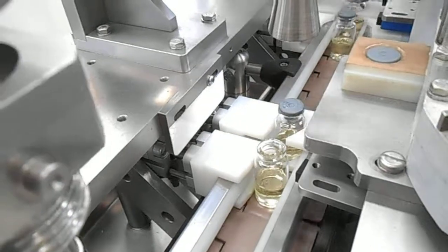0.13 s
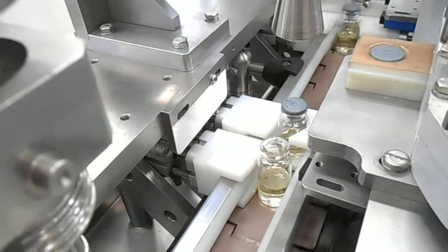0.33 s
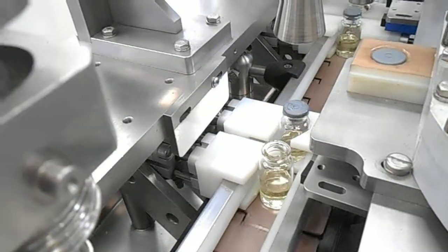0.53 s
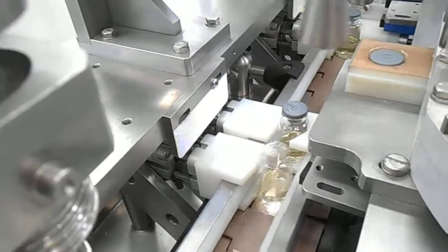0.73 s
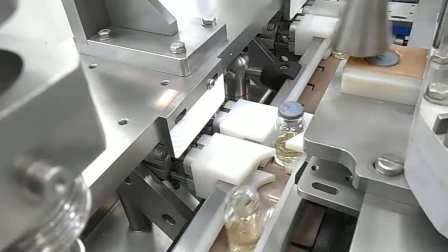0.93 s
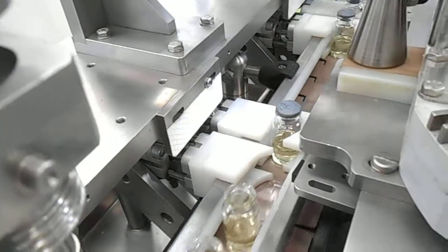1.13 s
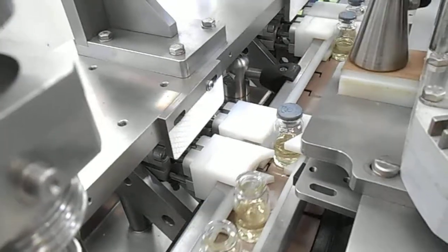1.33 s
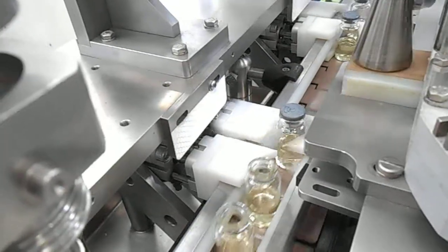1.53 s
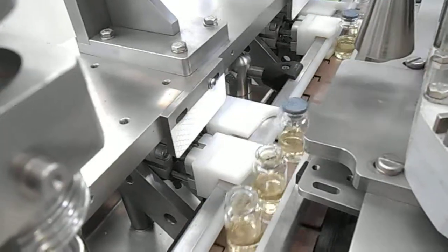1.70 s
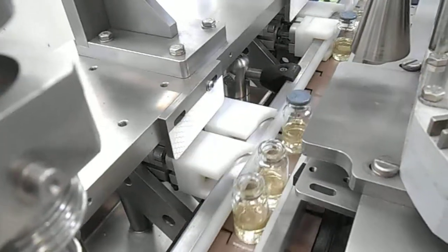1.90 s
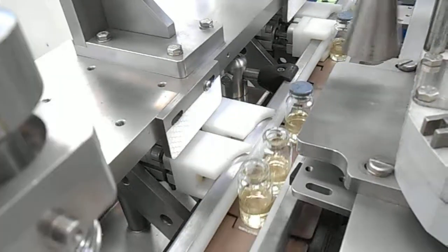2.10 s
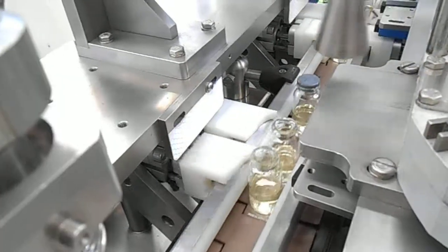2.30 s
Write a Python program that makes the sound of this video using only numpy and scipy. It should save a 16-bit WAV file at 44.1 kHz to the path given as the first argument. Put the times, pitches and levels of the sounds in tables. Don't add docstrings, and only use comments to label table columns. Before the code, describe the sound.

A vial filling machine runs close by, with low motor hum and airy hiss. Air puffs at 0.1 and 0.55 s; clacks and hollow thuds cluster near 0.3 and 0.8. From 1.03 to 1.35 a loud, slightly clipped flurry of clacks, rail rings, scrapes and glass clinks. The hum drops; a lower clink at 1.44, sharp snap at 1.6, lighter snaps at 1.9 and 2.05, then high chirps as hum and hiss rise.

```python
import sys
import numpy as np
from scipy import signal
from scipy.io import wavfile
from scipy.ndimage import uniform_filter1d

SR = 44100
rng = np.random.default_rng(int(sys.argv[2]) if len(sys.argv) > 2 else 0)


def generate_wav(sig):
    pcm = np.round(np.clip(np.atleast_2d(sig).T, -1, 1) * 32767).astype(np.int16)
    wavfile.write(sys.argv[1], SR, pcm)


def natural_amplitude(level_db):
    exponent = np.asarray(level_db, float) / 20
    return 10 ** exponent


N = 103635
T = np.arange(N) / SR

# pitch_hz, density_db
HALL_AIR = [(25, -10.5), (208, -9), (336, -10), (754, -15), (3100, -21.5), (6400, -17), (9000, -40.5),
            (12500, -63)]
# pitch_hz, width_hz, level_db
HUM_MODES = [(76.53, 31.43, -8.5), (203.61, 37.44, -1), (286.36, 38.65, -8.5), (482.87, 44.21, -2),
             (755.8, 60.53, -4), (1694.7, 71.5, -14.5)]
# time_s, level_db
PHONE_DUCK = [(0, -40.5), (.1, -31.5), (.35, -31), (.45, -34.5), (.6, -30), (1.03, -30), (1.17, -41.5),
              (1.4, -41.5), (1.5, -41), (1.72, -48.5), (1.88, -39), (2.08, -37.5), (2.35, -33)]
# time_s, level_db
FEEDER_HISS = [(0, -47.5), (1.7, -59), (1.9, -48), (2.35, -37)]
# start_s, level_db
FEEDER_CHIRPS = [
    (1.0058, -13.5),
    (1.7783, -43.5),
    (1.8397, -35.5),
    (2.0382, -28),
    (2.2114, -23.5),
    (2.271, -36),
    (2.32, -20),
]
# pitch_hz, level_db, wander_hz
MOTOR_TONES = [(203.86, -38.5, 5.7396), (769.7, -43, 7.783)]
# pitch_hz, width_hz, level_db
FAR_SOURCES = [(49.86, 78.9, -45), (8512, 249.7, -74), (1500, 1077, -60)]
# pitch_hz, width_hz, level_db
NOZZLE_MODES = [(2924.5, 441, -4), (4429, 245.3, 4), (7674.5, 676.7, -3), (8239.6, 202.2, -0.5),
                (10745, 1687, -19), (5578, 5738, -0.5)]
# start_s, length_s, level_db, release_s, attack_s
AIR_PUFFS = [
    (0.117, 0.22646, -30.5, 0.01423, 0.04942),
    (0.553, 0.0979, -22, 0.002848, 0.01935),
    (0.633, 0.2083, -34.5, 0.54, 0.0499),
    (0.85, 0.0245, -44, 0.0075, 0.01034),
]
# start_s, level_db, ring_hz, t60_s
SLIDE_CLACKS = [(0.1431, -18.5, 4455, 0.0268), (0.167, -12.5, 4420, 0.01402), (0.2651, -7, 1775, 0.1043),
                (0.2975, -7.5, 4155, 0.0229), (0.3044, -6.5, 1191, 0.07606), (0.546, -16.5, 7425, 0.0183),
                (0.5544, -37, 4490, 0.0182), (0.7627, -12, 2357, 0.07305), (0.7697, -6, 3079, 0.16536),
                (0.7929, -7.5, 3857, 0.1023), (1.0352, -0.5, 3704, 0.05256), (1.044, -16, 4313, 0.0354),
                (1.0754, -0.5, 3617, 0.0778), (1.1244, -11.5, 3900, 0.029), (1.1845, -16, 3838, 0.1026),
                (1.2195, -14, 4039, 0.01194), (1.3377, -15.5, 5922, 0.03184),
                (1.3676, -17.5, 4198, 0.02706), (1.4712, -22, 4597, 0.0249), (1.6075, -2, 1997, 0.0188),
                (1.896, -15.5, 4647, 0.0464), (2.053, -16.5, 5008, 0.03265)]
# start_s, level_db, ring_hz, t60_s
HIGH_TICKS = [(0.5066, -41.5, 4850, 0.03504), (1.0604, -14, 4913, 0.00772), (1.0844, -3, 5096, 0.01405),
              (1.1044, -3.5, 4764, 0.0362), (1.138, -1.5, 5108, 0.01637), (1.1614, -27.5, 5410, 0.02033),
              (1.2263, -10, 5164, 0.01404), (1.255, -19, 5921, 0.03093), (1.28, -36.5, 4341, 0.0209),
              (1.3067, -13, 5539, 0.0171), (1.3175, -25, 6300, 0.02633), (1.382, -17, 5942, 0.03435),
              (1.4027, -19.5, 4690, 0.0247), (1.4377, -5.5, 4483, 0.00997), (1.4422, 2, 4183, 0.01029),
              (1.6524, -23, 5663, 0.009736), (1.679, -30, 5654, 0.02092), (1.738, -46, 5370, 0.01746),
              (1.7552, -25, 6095, 0.00849), (1.7853, -28, 6157, 0.02994), (1.947, -32.5, 6632, 0.0128),
              (1.3118, -8.5, 6273, 0.02), (1.2985, -27, 5864, 0.02104), (1.4125, -22.5, 3972, 0.03173)]
# pitch_hz, level_db, t60_s
FRAME_MODES = [(303.2, -12.5, 0.03355), (322.59, -10, 0.0813), (412.02, 1, 0.132), (466.83, 1.5, 0.21),
               (526.94, 6.5, 0.12166), (598.82, 10, 0.03297), (741.65, -1.5, 0.2001),
               (830.68, 9.5, 0.024846), (1006.1, 1, 0.0436), (1307.9, 1.5, 0.011)]
# start_s, level_db, chatter_s, tilt_db_per_octave
PUSHER_THUDS = [(0.166, -20, 0.006936, 18.5), (0.262, -13.5, 0.01392, -4), (0.294, -8.5, 0.007486, -19.5),
                (0.305, -3.5, 0.005947, 3), (0.777, -16, 0.01695, 6.5), (0.794, -8, 0.021437, -4),
                (0.824, -16, 0.00452, -11.5), (1.084, -7.5, 0.00764, -10), (1.103, -23, 0.0032, -20),
                (1.4195, -14.5, 0.013793, 6), (1.436, -17, 0.007572, 12.5), (1.59, -22, 0.012215, -0.5),
                (1.894, -15, 0.01117, 13), (2.05, -21, 0.01025, -8.5)]
# start_s, length_s, level_db
BELT_SHUDDERS = [
    (0.297, 0.159, -33.5),
    (1.048, 0.085, -29),
    (2.046, 0.0581, -31),
]
# start_s, length_s,
# level_db, centre_hz
VIAL_SCRAPES = [(0.744, 0.09096, -27, 4082), (1.031, 0.08134, -19, 3800), (1.127, 0.09204, -36, 3557),
                (1.296, 0.02023, -26, 4722), (1.359, 0.02613, -32, 4722), (1.572, 0.02643, -39.5, 3500),
                (1.647, 0.03415, -39, 4416), (2.063, 0.0482, -36.5, 3594), (1.203, 0.21925, -38.5, 1500),
                (1.382, 0.0188, -66.5, 5926), (1.787, 0.01457, -45, 4263), (1.849, 0.57, -51.5, 9695)]
# pitch_hz, level_db, t60_s
LATCH = [(1170.7, -7, 0.01623), (1500, -3.5, 0.0178), (1926, -3, 0.0245), (2453.5, -3, 0.00836),
         (3052.9, -11, 0.0106), (3980.1, -1.5, 0.01381), (4521.2, -7, 0.01108), (5266.4, -1.5, 0.00598),
         (6655.5, -11.5, 0.01617), (8340.8, -8.5, 0.0147), (9768.4, -10, 0.01782)]
STOP = [(2299.6, -4.5, 0.02928), (3533.6, -15, 0.0189), (4861.6, -2, 0.02105), (5227, -5, 0.01792),
        (6890.5, -7, 0.0119), (9946.6, -12.5, 0.0202)]
PADDLE = [(2409.3, -0.5, 0.03057), (3500, -2.5, 0.0218), (3900, -1, 0.02137), (5285.2, 1.5, 0.0335),
          (6300, -8, 0.0195)]
SQUEAL = [(1641.8, -0.5, 0.0597), (1756.5, -6, 0.0146), (1577.7, -15.5, 0.0387)]
FINGER = [(3224.9, -0.5, 0.01771), (4650.3, 0.5, 0.02057), (4770.6, 0.5, 0.0315), (7180, -0.5, 0.01287),
          (8127.4, 3, 0.00688), (9588, -3.5, 0.01006), (10403, 1, 0.01214), (11668, -7, 0.016)]
# start_s, level_db, free_ring_s, part
LATCH_SNAPS = [(1.6073, -0.5, 0.0019155, LATCH), (1.6165, -25, 0.000841, STOP),
               (1.6258, -41, 0.001885, STOP), (1.8958, -12.5, 0.001491, STOP),
               (2.0528, -6, 0.001309, FINGER), (0.761, -12.5, 0.00186, PADDLE),
               (0.77, -4, 0.002144, PADDLE), (0.7765, -11.5, 0.00239, PADDLE),
               (0.805, -20, 0.00372, PADDLE), (1.557, -47.5, 0.000912, FINGER),
               (1.107, -11.5, 0.01918, SQUEAL)]
# pitch_hz, level_db, t60_s
RAIL_MODES = [(1664, 0, 0.055), (1632, -2, 0.06), (1780, -4, 0.02), (1500, -9, .03)]
# start_s, level_db
KNOCKS = [(1.058, -14), (1.081, -13), (1.105, -8), (1.114, -14), (1.14, -17), (1.162, -21), (1.2, -29),
          (1.222, -26), (1.31, -30), (1.957, -36), (2.072, -35), (2.112, -35)]
# ratio_to_lowest, level_db, t60_s
VIAL_MODES = [(1, 0, .012), (1.012, -30, .1), (1.27, -12, .01), (1.75, -14, .01), (2.4, -20, .022)]
# start_s, level_db, pitch_hz, free_ring_s
VIAL_CLINKS = [
    (1.076, 1, 3950, .005),
    (1.1385, 0, 4000, .002),
    (1.227, -5, 3940, .002),
    (1.256, -19, 3930, .002),
    (1.281, -17, 4100, .001),
    (1.324, -11, 3920, .003),
]
# ratio_to_lowest, level_db, t60_s
CAPPED_MODES = [(1, 0, .011), (1.014, -33, .22), (1.4, -11, .01), (1.95, -15, .01), (2.9, -22, .008)]
# start_s, level_db, pitch_hz, free_ring_s
STOPPERED_CLINK = (1.4435, 0, 3300, .0062)

FLICKER_DB, FLICKER_PER_S = 1, 15
RISE_S = 0.0007


def band(x, hz, width_hz):
    return signal.lfilter(*signal.iirpeak(hz, max(hz / width_hz, 1 / 3), fs=SR), x)


def band_noise(hz, width_hz):
    return band(band(rng.standard_normal(N), hz, width_hz), hz, 2 * width_hz)


def unit(x):
    return x / np.sqrt(np.mean(x ** 2))


def walk(rate_per_s):
    hold = int(SR / rate_per_s)
    steps = np.repeat(rng.standard_normal(N // hold + 1), hold)
    smooth = uniform_filter1d(uniform_filter1d(steps, hold), hold)
    return unit(smooth[:N])


def flicker():
    return natural_amplitude(FLICKER_DB * walk(FLICKER_PER_S))


def gate(start_s, length_s, attack_s, release_s):
    attack = np.clip((T - start_s) / attack_s, 0, 1)
    return attack * np.exp(-np.maximum(T - start_s - length_s, 0) / release_s)


def decay(t, t60_s):
    return 1000.0 ** (-t / t60_s)


def add(out, start_s, x, peak_db):
    i = int(start_s * SR)
    out[i:i + len(x)] += (x * natural_amplitude(peak_db) / np.abs(x).max())[:N - i]


def strike(modes, chatter_s, scatter_db):
    t = T[:SR // 4]
    ring = np.zeros(len(t))
    for hz, db, t60_s in modes:
        level = natural_amplitude(db + scatter_db * rng.standard_normal())
        ring += level * np.sin(2 * np.pi * hz * t) * decay(t, t60_s)
    push = rng.standard_normal(SR // 20) * np.exp(-(T[:SR // 20] / chatter_s) ** 2)
    return signal.fftconvolve(ring, push)


def clink(hz, free_ring_s, modes):
    t = T[:SR // 4]
    ring = np.zeros(len(t))
    for ratio, db, t60_s in modes:
        tone = np.sin(2 * np.pi * (hz * ratio * t + rng.random()))
        ring += natural_amplitude(db) * tone * decay(np.maximum(t - free_ring_s, 0), t60_s)
    return np.minimum(t / RISE_S, 1) * ring


def duck_db():
    return np.interp(T, *np.array(PHONE_DUCK).T) + 33.5


def machinery():
    hall_hz, hall_db = np.array(HALL_AIR).T
    hall = np.zeros(N)
    for hz in 28 * 2 ** np.arange(0, 9, 0.5):
        level = natural_amplitude(np.interp(np.log(hz), np.log(hall_hz), hall_db))
        hall += level * band_noise(hz, hz / 2.0751) * flicker()
    hum = sum(natural_amplitude(db) * unit(band_noise(hz, width_hz) * flicker()) for hz, width_hz, db in HUM_MODES)
    duck = duck_db()
    return unit(hall) * natural_amplitude(-34 + duck) + unit(hum) * natural_amplitude(-36.5 + duck)


def feeder():
    hiss = unit(band_noise(6429, 491.6) * flicker())
    level = natural_amplitude(np.interp(T, *np.array(FEEDER_HISS).T))
    for start_s, db in FEEDER_CHIRPS:
        level = level + natural_amplitude(db - 10) * gate(start_s, 0.004766, 0.001323, 0.010264)
    return hiss * level


def far():
    return sum(natural_amplitude(db) * flicker() * unit(band_noise(hz, width_hz)) for hz, width_hz, db in FAR_SOURCES)


def motors():
    duck = duck_db()
    out = np.zeros(N)
    for hz, db, wander_hz in MOTOR_TONES:
        level = natural_amplitude(db + duck + 0.97 * walk(29.641))
        cycles = np.cumsum(hz + wander_hz * walk(39.759)) / SR
        out += level * np.sin(2 * np.pi * cycles)
    return out


def exhaust():
    flutter_db = 0
    jet = sum(natural_amplitude(db + flutter_db * walk(151.1)) * unit(band_noise(hz, width_hz))
              for hz, width_hz, db in NOZZLE_MODES)
    puffs = sum(natural_amplitude(db) * gate(start_s, length_s, attack_s, release_s)
                for start_s, length_s, db, release_s, attack_s in AIR_PUFFS)
    return unit(jet) * puffs


def clack(ring_hz, t60_s):
    crack_hz, crack_width_hz, tail_db, tail_s, ring_db = 3800, 4380, -22, 0.06702, 7
    t = T[:SR // 6]
    envelope = decay(t, t60_s) + natural_amplitude(tail_db) * decay(t, tail_s)
    burst = rng.standard_normal(len(t)) * envelope * np.minimum(t / RISE_S, 1)
    crack = band(burst, np.sqrt(ring_hz * crack_hz), crack_width_hz)
    crack = band(crack, crack_hz, 2 * crack_width_hz)
    ring_width_hz = max(ring_hz / 10, 650)
    ring = sum(gain * band(burst, ratio * ring_hz, ring_width_hz)
               for ratio, gain in ((1.0106, 0.9871), (0.55066, 0.487), (1.7979, 0.2706)))
    return unit(crack) + natural_amplitude(ring_db) * unit(ring)


def clacks():
    lowpass = signal.butter(2, 8500, fs=SR)
    out = np.zeros(N)
    for start_s, db, ring_hz, t60_s in list(SLIDE_CLACKS) + list(HIGH_TICKS):
        add(out, start_s, signal.lfilter(*lowpass, clack(ring_hz, t60_s)), db)
    return out


def thuds():
    highpass = signal.butter(2, 293.2, "high", fs=SR, output="sos")
    out = np.zeros(N)
    for start_s, db, chatter_s, tilt_db in PUSHER_THUDS:
        modes = []
        for hz, mode_db, t60_s in FRAME_MODES:
            shifted_hz = hz * (1 + 0.028143 * rng.standard_normal())
            modes.append((shifted_hz, mode_db + tilt_db * np.log2(hz / 500), t60_s))
        body = strike(modes, chatter_s, scatter_db=5.0)
        add(out, start_s, signal.sosfilt(highpass, body), db)
    return out


def frame_boom():
    boom = unit(band_noise(463.94, 421.55))
    return boom * sum(natural_amplitude(db - 20) * gate(start_s, 0.00569, 0.005313, 0.03005)
                      for start_s, db, *_ in PUSHER_THUDS)


def belt():
    hz = 99.67
    shudder = unit(band_noise(hz, 3.114 * hz) * flicker())
    return shudder * sum(natural_amplitude(db) * gate(start_s, length_s, 0.002764, 0.0367)
                         for start_s, length_s, db in BELT_SHUDDERS)


def scrapes():
    grains_per_s, spread_db, edge_s = 5000, 1.5, 0.00754
    hits = (rng.random(N) < grains_per_s / SR) * rng.standard_normal(N)
    grains = hits * natural_amplitude(spread_db * (rng.exponential(size=N) + walk(110)))
    out = np.zeros(N)
    for start_s, length_s, db, hz in VIAL_SCRAPES:
        slide = unit(band(band(grains, hz, 0.7555 * hz), hz, hz))
        out += natural_amplitude(db) * gate(start_s, length_s, edge_s, 3.413 * edge_s) * slide
    return out


def latches():
    out = np.zeros(N)
    for start_s, db, free_ring_s, part in LATCH_SNAPS:
        add(out, start_s, clink(0.98854, free_ring_s, part), db)
    return out


def rail():
    out = np.zeros(N)
    for start_s, db in KNOCKS:
        add(out, start_s, strike(RAIL_MODES, 0.002, scatter_db=0), db)
    return out


def vials():
    out = np.zeros(N)
    for start_s, db, hz, free_ring_s in VIAL_CLINKS:
        add(out, start_s, clink(hz, free_ring_s, VIAL_MODES), db)
    start_s, db, hz, free_ring_s = STOPPERED_CLINK
    add(out, start_s, clink(hz, free_ring_s, CAPPED_MODES), db)
    return out


def panel_echo():
    t = T[:SR // 2]
    tail = band(rng.standard_normal(len(t)), 1253.7, 3300) * decay(t, 0.15) * (t > 0.004)
    return tail / np.sqrt(np.sum(tail ** 2))


def scene():
    frame_hits, rail_rings = thuds(), rail()
    slides, glass = clacks(), vials()
    rattle = natural_amplitude(3 * walk(200))
    near = slides + frame_hits * rattle + exhaust() + scrapes()
    rings = glass + rail_rings * rattle
    echo = panel_echo()
    steady = machinery() + feeder() + belt() + far() + motors()
    near = near + latches() + frame_boom()
    wet = signal.fftconvolve(near + natural_amplitude(-12) * rings, echo)[:N]
    return (near + rings + natural_amplitude(-22) * wet + steady)[None]


def lowpass_steep(x, hz):
    return signal.sosfiltfilt(signal.butter(14, hz, fs=SR, output="sos"), x)


def low_pass(x):
    return signal.sosfilt(signal.butter(12, 16640, fs=SR, output="sos"), x)


def record(dry):
    edge_hz, shelf_hz, clip_level = 12100, 10500, 0.7
    shelf, splash = natural_amplitude(-11), natural_amplitude(-16)
    x = lowpass_steep(dry, edge_hz) * shelf + lowpass_steep(dry, shelf_hz) * (1 - shelf)
    x = x / (1 + np.abs(x / clip_level) ** 8) ** (1 / 8)
    x = splash * x + (1 - splash) * lowpass_steep(x, edge_hz)
    return low_pass(x)


dry = scene()
out = record(dry)
generate_wav(out)
```